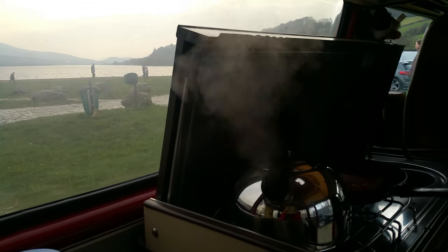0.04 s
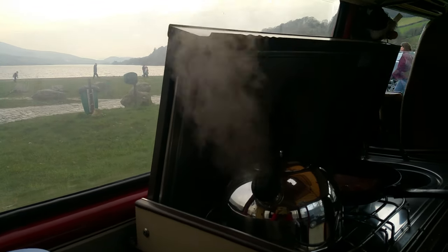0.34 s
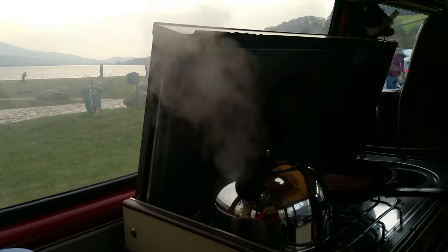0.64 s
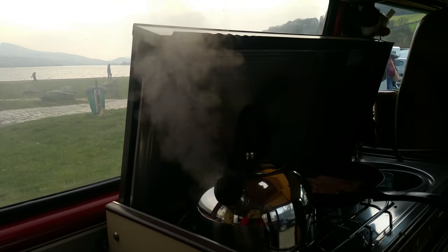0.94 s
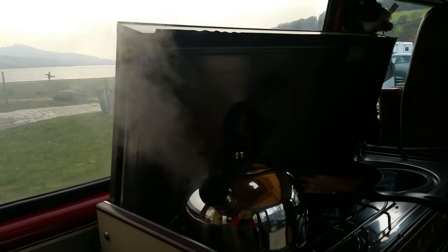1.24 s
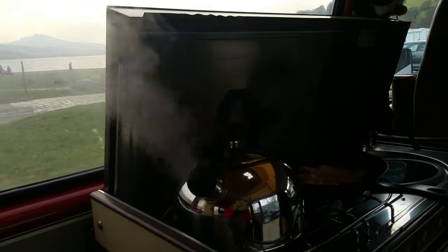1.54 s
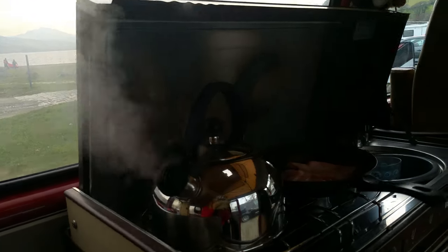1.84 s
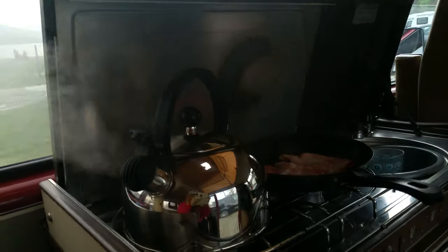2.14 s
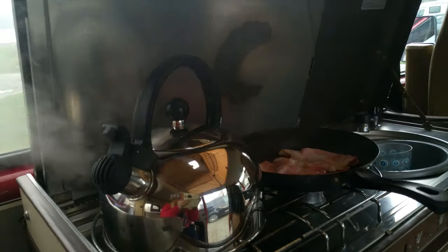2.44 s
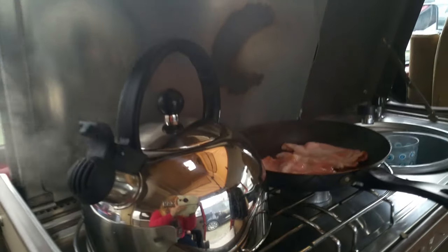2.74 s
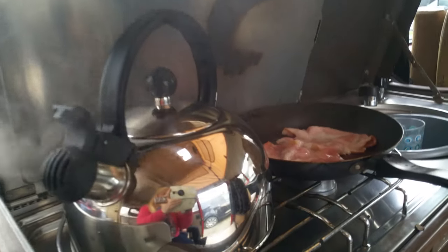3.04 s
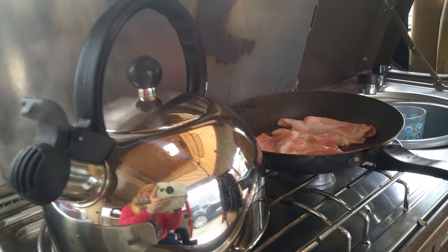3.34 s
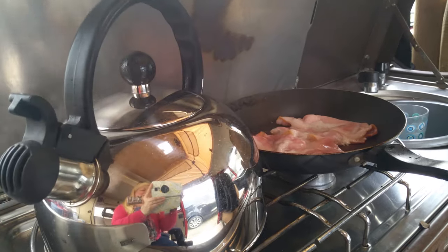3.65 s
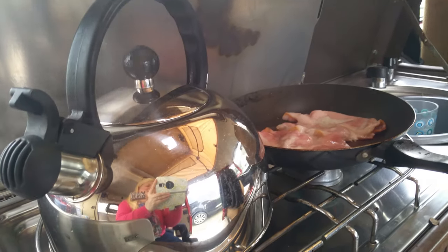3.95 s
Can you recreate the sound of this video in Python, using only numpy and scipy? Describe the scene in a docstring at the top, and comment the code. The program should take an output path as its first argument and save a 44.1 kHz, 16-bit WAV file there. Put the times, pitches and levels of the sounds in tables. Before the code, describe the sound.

A kettle whistles shrilly over hissing steam, faint frying and a low throb.

```python
"""A steel kettle whistles on the hob of a small camper kitchen. Its steam jet sounds a shrill note in
the spout, fluttering and at times hoarse, over a faint lower note and a hiss of steam and gas flame.
To its right, bacon sizzles with tiny bursts of hot fat and grows louder as the listener moves closer.
Underneath, a low, surging throb booms in the cabin, perhaps from a small engine idling outside."""
import sys
import numpy as np
from scipy import signal
from scipy.fft import rfft, irfft, next_fast_len
from scipy.io import wavfile
from scipy.ndimage import uniform_filter1d, map_coordinates

SR = 44100
rng = np.random.default_rng(int(sys.argv[2]) if len(sys.argv) > 2 else 0)


def transcribe(u):
    """Save the signal u as a 16-bit wav file named by the first command-line argument.

    u: samples, shape (n,) or (channels, n), limited to [-1, 1]; the rate is SR.
    q: integer samples, one column per channel.
    """
    v = np.clip(np.atleast_2d(u).T, -1, 1)
    q = np.round(v * 32767).astype(np.int16)
    wavfile.write(sys.argv[1], SR, q)


N = 176400  # 4 seconds

# How high the shrill note is. Each row: time in seconds, pitch in Hz.
WHISTLE_PITCH = [(0.0, 4370), (0.02, 4290), (0.04, 4460), (0.07, 4273), (0.23, 4454), (0.28, 4319),
                 (0.39, 4367), (0.41, 4330), (0.47, 4510), (0.5, 4386), (0.58, 4407), (0.6, 4520),
                 (0.79, 4347), (0.85, 4344), (0.88, 4247), (0.9, 4336), (0.93, 4246), (0.95, 4362),
                 (1.24, 4247), (1.28, 4314), (1.3, 4266), (1.34, 4435), (1.48, 4306), (1.54, 4350),
                 (1.65, 4267), (1.72, 4224), (1.77, 4264), (1.83, 4250), (1.87, 4370), (1.92, 4220),
                 (2.15, 4314), (2.2, 4250), (2.41, 4350), (2.58, 4267), (2.66, 4378), (2.86, 4305),
                 (2.95, 4364), (3.0, 4217), (3.06, 4373), (3.17, 4262), (3.4, 4290), (3.43, 4207),
                 (3.53, 4337), (3.58, 4154), (3.64, 4327), (3.69, 4206), (3.74, 4340), (3.76, 4200),
                 (3.8, 4223), (3.86, 4116), (3.91, 4254), (3.99, 4220)]
# How loud it is. Each row: time in seconds, level in dB.
WHISTLE_LEVEL = [(0.0, -18.4), (0.13, -17.6), (0.24, -21.3), (0.26, -16.7), (0.37, -18.3), (0.39, -23.5),
                 (0.41, -17.8), (0.48, -23.4), (0.5, -18.7), (0.56, -21.3), (0.63, -29.8), (0.66, -21.9),
                 (0.67, -27.2), (0.71, -21.3), (0.77, -21.2), (0.8, -29.3), (0.82, -23.4), (0.98, -25.5),
                 (1.22, -24.6), (1.3, -28.0), (1.33, -21.8), (1.41, -22.7), (1.53, -20.4), (1.68, -24.6),
                 (1.75, -22.8), (1.77, -26.2), (1.87, -20.4), (1.92, -24.8), (1.98, -20.4), (2.1, -23.1),
                 (2.12, -21.1), (2.21, -26.9), (2.4, -19.1), (2.52, -24.8), (2.62, -20.1), (2.73, -22.8),
                 (2.76, -21.2), (2.85, -25.6), (2.94, -21.5), (3.07, -24.4), (3.4, -20.7), (3.42, -23.8),
                 (3.52, -20.8), (3.62, -23.0), (3.76, -21.9), (3.99, -23.9)]
# Standing waves in the cabin favour one ear. Each row: time in seconds, left minus right in dB.
WHISTLE_BALANCE = [(0.0, 5.8), (0.2, 10), (0.28, 9.5), (0.37, 8), (0.47, 6), (0.53, 11.1), (0.63, -3.1),
                   (0.71, 0), (1.07, 2), (1.17, -14.5), (1.33, 5.5), (1.79, -5.5), (1.87, 4), (2.07, -3),
                   (2.31, 7), (2.37, -1), (2.53, 9), (2.62, 17), (2.66, -1.5), (2.87, 6), (2.96, 0.1),
                   (3.23, 6.5), (3.42, 3), (3.47, 5), (3.58, 1.1), (3.99, 3.3)]
# How far the note's wave is ahead at the left ear. Each row: time in seconds, phase in radians.
WHISTLE_LEFT_LEAD = [(0.0, -1.1), (0.19, -1.1), (0.31, 0.7), (0.42, 0.7), (0.47, 2.1), (0.52, 0.2),
                     (0.57, 1.2), (0.8, 2.5), (1.05, 2.5), (1.18, 5), (1.23, -0.3), (1.29, 4.5),
                     (1.32, 0.6), (1.73, 1.6), (1.9, 2.5), (2.02, 2), (2.55, 4), (2.57, 8.5), (2.61, 3),
                     (2.93, 5.5), (3.45, 6.5), (3.99, 5.5)]
# How breathy the note turns. Each row: time in seconds, share of noise from 0 to 1.
WHISTLE_HOARSENESS = [(0, .02), (.33, .03), (.45, .15), (.6, .55), (.72, .3), (.82, .75), (1.0, .15),
                      (1.2, .1), (1.3, .6), (1.35, .04), (2.0, .02), (2.17, .6), (2.3, .06), (2.6, .03),
                      (2.75, .15), (2.93, .03), (3.1, .12), (3.3, .03), (4, .02)]
# The spout's lower note. Each row: time in seconds, level in dB, left minus right in dB.
LOW_NOTE_LEVEL = [(0, -43, 4), (.5, -44.5, 2), (.9, -44, -2), (1.0, -41, -2), (1.27, -38.5, 3),
                  (1.36, -52, -9), (1.55, -42, 1), (1.8, -47.5, -4), (2.2, -42, 1), (2.4, -42.5, -11),
                  (2.55, -48.5, -4), (2.95, -43, 21.5), (4, -43.5, 29)]
# The tone of the steam and burner hiss. Each row: frequency in Hz, left level in dB, right level in dB.
STEAM_TONE = [(150, -79, -81), (334, -79.5, -80), (500, -84.5, -83), (645, -80.5, -78), (837, -75.5, -76.5),
              (1084, -84.5, -81.5), (1470, -81, -79), (1800, -74, -78), (1950, -74.5, -76.5),
              (2360, -68.5, -72), (2700, -73, -75), (4000, -73, -74.5), (5240, -74.5, -75.5),
              (6000, -84, -82.5), (15500, -90.5, -89)]
# How that tone changes from close by. Each row: frequency in Hz, change in dB.
STEAM_NEAR_CHANGE = [(250, -6.5), (450, 5), (700, 1), (900, -2), (1400, 3), (2000, 0.5), (2600, -4),
                     (3500, -.5), (6000, -4.5)]
# The hiss swells as the listener comes closer. Each row: time in seconds, change in dB.
STEAM_SWELL = [(0, -0.5), (1.2, -.5), (2, 0), (2.6, 1), (3.1, 1), (4, 2)]
# How alike the hiss is at both ears. Each row: frequency in Hz, likeness (1 the same, 0 unrelated).
STEAM_LIKENESS = [(100, .99), (300, 0.71), (700, 0.81), (1300, -0.076), (2500, -0.013), (8000, 0.1)]
# Frying fat from afar. Each row: frequency in Hz, left level in dB, right level in dB.
FAT_FAR_TONE = [(1500, -100, -100), (4000, -127, -82.5), (5270, -79, -74), (6730, -86, -69),
                (6900, -83, -69.5), (7940, -85.5, -77.5), (10500, -84.5, -77.5), (12000, -88, -80.5),
                (15500, -93, -87.5)]
# Frying fat from close by. Each row: frequency in Hz, left level in dB, right level in dB.
FAT_NEAR_TONE = [(1510, -98, -97), (4300, -66, -69.5), (5630, -73, -69.5), (6320, -77, -65),
                 (7200, -82, -69.5), (7900, -80, -76), (9550, -81, -68.5), (12000, -84, -77),
                 (15500, -89, -82)]
# Surges of the throb, two strong firings each. Each row: start in seconds, strength in dB.
THROB_SURGES = [(0.014, -27), (0.104, -27), (0.144, -23), (0.23, -25.5), (0.363, -31.5), (0.491, -22),
                (0.64, -24.5), (0.766, -20.5), (0.918, -26), (1.004, -25.5), (1.097, -24.5), (1.139, -24),
                (1.234, -30.5), (1.286, -31), (1.37, -26), (1.467, -23), (1.504, -22), (1.599, -26.5),
                (1.679, -33), (1.735, -23.5), (1.78, -24.5), (1.829, -28), (1.869, -26.5), (1.916, -27),
                (2.006, -23.5), (2.105, -25.5), (2.15, -28), (2.202, -25), (2.293, -24.5), (2.397, -27),
                (2.434, -25.5), (2.489, -28), (2.583, -29.5), (2.687, -24.5), (2.719, -31), (2.866, -26.5),
                (2.971, -25), (2.999, -21.5), (3.146, -29), (3.246, -25), (3.279, -27), (3.425, -25.5),
                (3.552, -24), (3.603, -29), (3.7, -28), (3.794, -24.5), (3.836, -25), (3.886, -27.5),
                (3.974, -25)]
# The tone of the cabin's boom. Each row: frequency in Hz, relative level in dB.
BOOM_TONE = [(15, -24), (28, -19), (40, -20.5), (55, -6.5), (72, -2), (88, -7), (110, -3.5), (135, -7.5),
             (184, -10.5), (217, -18.5), (259, -15.5), (302, -30.5), (420, -30.5), (600, -60)]

FLUTTER_HZ, WARBLE_HZ = 20.6, 11.5  # typical size of the fast and the slower swings in pitch
WHISTLE_ECHO_DB, ECHO_FADE_S = -9, 0.13  # the cabin's echo takes this long to fall by 60 dB
APPROACH_S = (1.64, 3.03)  # start and end of the move toward the hob
POPS_PER_S, POP_SPREAD_DB, POP_SHARE = 2500, 2.6, 0.25
FIRING_HZ, IDLE_DB, RUMBLE_DB = 43.7, -42.5, -41.5
RING_HZ, RING_WIDTH_HZ, RING_GAIN = 88.4, 28, 2.03  # the main resonance of the cabin's air
TOP_HZ = 15820


def whistle():
    """The steam jet locks to the spout's note; turbulence shakes it and at times turns it hoarse."""
    hoarse, = curves(WHISTLE_HOARSENESS)
    flutter = FLUTTER_HZ * (1 + 1.44 * hoarse) * wobble(150)  # wider when hoarse
    hz = curves(WHISTLE_PITCH)[0] + flutter + WARBLE_HZ * wobble(45)
    shiver = amp(2.5 * wobble(100))
    tone = unit(oscillator(hz) * shiver)
    breath = unit(resonance(width_hz=67) + 0.41 * np.array([resonance(67), resonance(67)]))
    roughness = np.sqrt(1 - hoarse) + np.sqrt(hoarse) * breath
    lead, = curves(WHISTLE_LEFT_LEAD)
    direct = tone * roughness * np.exp(0.5j * np.array([lead, -lead]))
    wave = unit(direct + amp(WHISTLE_ECHO_DB) * cabin_echo(tone))
    limited = wave / (1 + np.abs(wave / 1.25) ** 4) ** (1 / 4)  # the note's swing levels off
    return amp(curves(WHISTLE_LEVEL)[0]) * panned(curves(WHISTLE_BALANCE)[0]) * unit(limited).real


def low_note():
    """The spout also rings weakly near half the pitch, half noise, following the whistle's slow drift."""
    drift = uniform_filter1d(curves(WHISTLE_PITCH)[0], size=5000)
    hz = 0.501 * drift + 9 * wobble(40)
    db, balance_db = curves(LOW_NOTE_LEVEL)
    roughness = 1 + amp(-1) * np.array([resonance(width_hz=34), resonance(width_hz=34)])
    return amp(db) * panned(balance_db) * unit((roughness * oscillator(hz)).real)


def steam():
    """The plume of steam and the gas flame make a broad hiss whose tone changes from close by."""
    def spread(f):
        angle = np.arccos(along(STEAM_LIKENESS, f)[0]) / 2
        return np.array([np.cos(angle), np.sin(angle)])
    middle, side = filtered(patchy_noise(depth_db=1.5), spread)
    far = with_tone(np.array([middle + side, middle - side]), STEAM_TONE)
    near = filtered(far, lambda f: amp(along(STEAM_NEAR_CHANGE, f)))
    return approach(far, near) * amp(curves(STEAM_SWELL)[0] + 0.52 * wobble(25.05))


def sizzle():
    """Tiny bursts in the hot fat merge into a dense sputter, brighter from close by."""
    hits = rng.random(N) < POPS_PER_S / SR
    sizes = hits * amp(POP_SPREAD_DB * np.minimum(rng.exponential(size=N), 4.5))
    decay = np.exp(-1 / (0.00015 * SR))  # each pop dies away within a millisecond or so
    power = signal.lfilter([1], [1, -decay], sizes ** 2)
    pops = unit(np.sqrt(np.abs(power)) * rng.standard_normal((2, N)))
    fat = np.sqrt(POP_SHARE) * pops + np.sqrt(1 - POP_SHARE) * patchy_noise(depth_db=2.3)
    fat *= amp(0.6 * wobble(35.24) + 0.35 * wobble(6.43))  # the level flickers
    return approach(with_tone(fat, FAT_FAR_TONE), with_tone(fat, FAT_NEAR_TONE))


def throb():
    """Weak, even firings and surges of strong ones boom in the cabin, over a soft rumble."""
    jitter, scatter = rng.standard_normal((256, 2)).T
    idle = firings(np.arange(256) / FIRING_HZ + 0.001 * jitter, db=4 * scatter)
    starts, db = np.transpose(THROB_SURGES)
    starts = starts + 0.00497  # the boom takes a moment to build
    surges = firings(starts, db) + firings(starts + 1 / FIRING_HZ, db - 2.5)
    rumble = amp(RUMBLE_DB) * unit(cabin_boom(rng.standard_normal(N)))
    middle = cabin_boom(surges) + amp(IDLE_DB) * unit(cabin_boom(idle)) + rumble
    upper_rumble = filtered(cabin_boom(rng.standard_normal(N)), lambda f: (f / (f + 400)) ** 2)
    side = amp(-56) * unit(upper_rumble)  # adds a little width
    return np.array([middle + side, middle - side])


def firings(seconds, db):
    """One sharp kick of pressure at each given time."""
    at = np.round(seconds * SR).astype(int)
    inside = (at >= 0) & (at < N)
    return np.bincount(at[inside], amp(db[inside]), N)


def cabin_boom(x):
    """The air in the cabin favours low notes and rings on after each kick."""
    def response(f):
        tone = amp(along(BOOM_TONE, f)[0]) * f / (f + 8) / (1 + (f / 600) ** 4)
        damping = 1j * f * RING_WIDTH_HZ
        ring = 1 + RING_GAIN * damping / (RING_HZ ** 2 - f ** 2 + damping)
        smear = np.exp(-1j * (1 + (f / 80) ** 2))  # higher notes arrive later
        return tone * ring * smear / np.abs(tone * ring).mean()
    return filtered(x, response)


def cabin_echo(x):
    """The small cabin sends a short echo to each ear."""
    t = np.arange(SR // 6) / SR
    tail = rng.standard_normal((2, len(t))) * amp(-60 * t / ECHO_FADE_S)
    return unit(signal.fftconvolve(x[None], tail, axes=1)[:, :N])


def approach(far, near):
    """Fades from the far sound to the near one as the listener moves toward the hob."""
    close = np.interp(np.arange(N) / SR, APPROACH_S, [0, 1])
    return (1 - close) * far + close * near


def oscillator(hz):
    """A wave that follows a pitch; its real part is the sound."""
    return np.exp(2j * np.pi * np.cumsum(hz) / SR)


def resonance(width_hz):
    """Random swings in the strength and phase of a note driven by turbulence."""
    keep_slow = lambda f: 1 / (1 + 1j * f / width_hz) / (1 + (f / (4 * width_hz)) ** 2)
    real, imaginary = filtered(rng.standard_normal((2, N)), keep_slow)
    return unit(real + 1j * imaginary)


def patchy_noise(depth_db):
    """Two white noises with louder and softer patches across time and frequency."""
    spectrum = signal.stft(rng.standard_normal((2, N)), nperseg=512)[2]
    patches = uniform_filter1d(uniform_filter1d(rng.standard_normal(spectrum.shape), 6, 1), 12, 2)
    return unit(signal.istft(spectrum * amp(depth_db * unit(patches)), nperseg=512)[1][:, :N])


def wobble(rate):
    """A smooth curve through `rate` random values a second."""
    return map_coordinates(rng.standard_normal(4096), [np.arange(N) * rate / SR], mode="wrap")


def curves(rows):
    """Turns a table over time into one curve for each column after the first."""
    seconds, *columns = np.transpose(rows)
    return [np.interp(np.arange(N) / SR, seconds, column) for column in columns]


def along(rows, hz):
    """Reads a table over frequency at hz, on a log scale."""
    f, *columns = np.transpose(rows)
    return np.array([np.interp(np.log(hz + 1), np.log(f + 1), column) for column in columns])


def with_tone(noise, rows):
    """Shapes white noise to a table's levels, taken as dB per Hz."""
    return filtered(noise, lambda f: amp(along(rows, f)) * np.sqrt(SR / 2))


def filtered(x, response):
    """Multiplies each frequency f in x by response(f)."""
    size = next_fast_len(N + SR // 2)
    return irfft(rfft(x, size) * response(np.fft.rfftfreq(size, 1 / SR)), size)[..., :N]


def panned(db):
    """Left and right gains that make the left louder by db."""
    gains = amp(np.array([db, -db]) / 2)
    return gains / np.sqrt(np.mean(gains ** 2, axis=0))


def amp(db):
    """Turns dB into a gain."""
    return 10 ** (np.asarray(db) / 20)


def unit(x):
    """Scales x to an average power of 1."""
    return x / np.sqrt(np.mean(np.abs(x) ** 2) + 1e-20)


def scene():
    """Kettle, frying pan and throb together."""
    return whistle() + low_note() + steam() + sizzle() + throb()


def record(dry):
    """Cuts off the treble above TOP_HZ."""
    return filtered(dry, lambda f: f < TOP_HZ)


dry = scene()
out = record(dry)
transcribe(out)
```